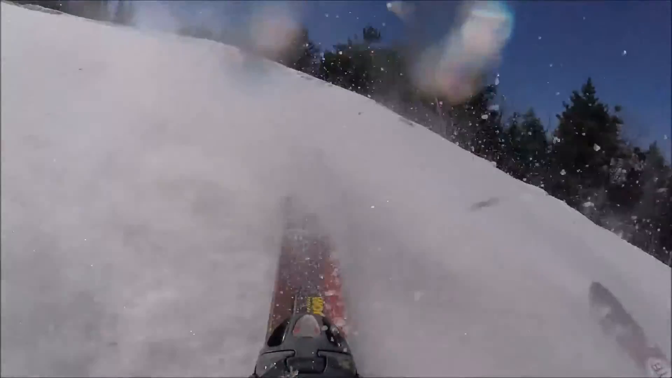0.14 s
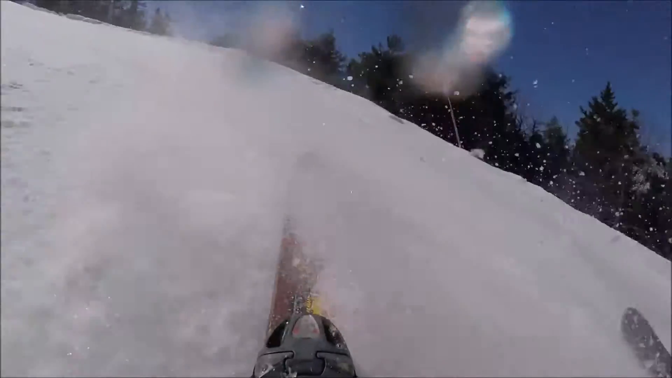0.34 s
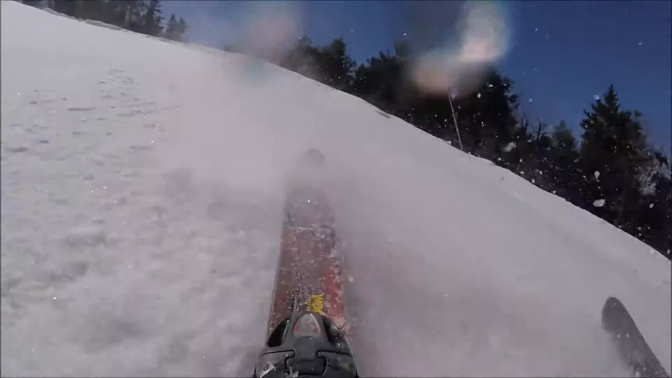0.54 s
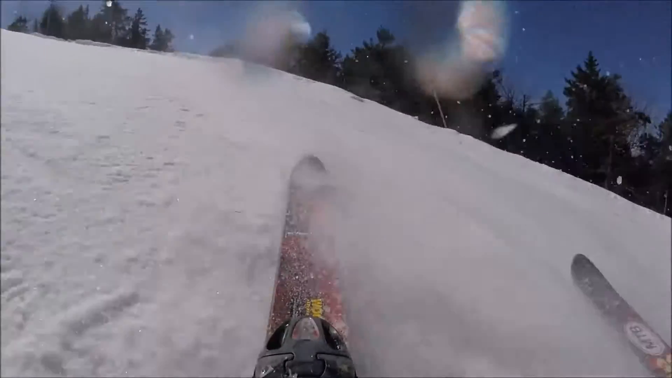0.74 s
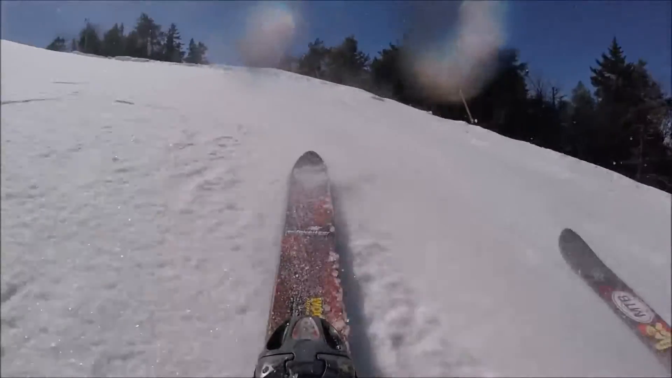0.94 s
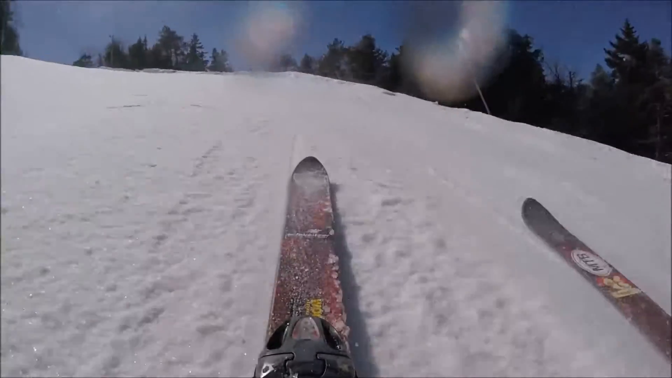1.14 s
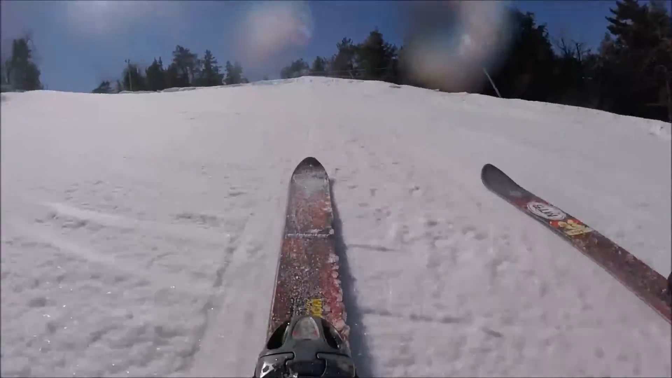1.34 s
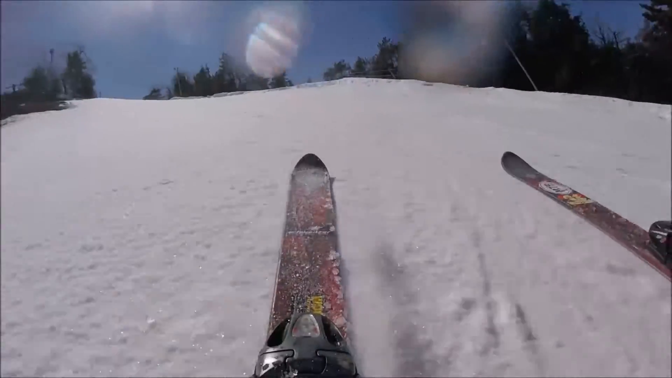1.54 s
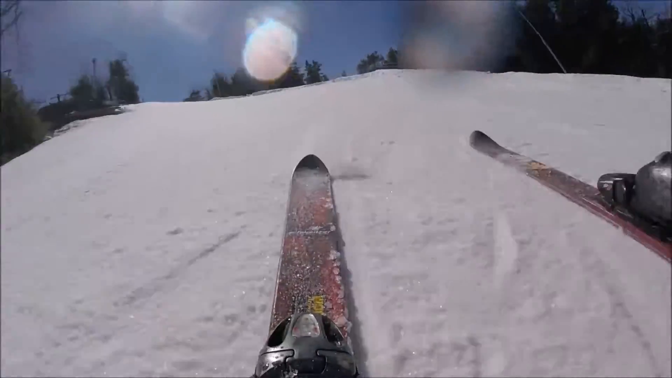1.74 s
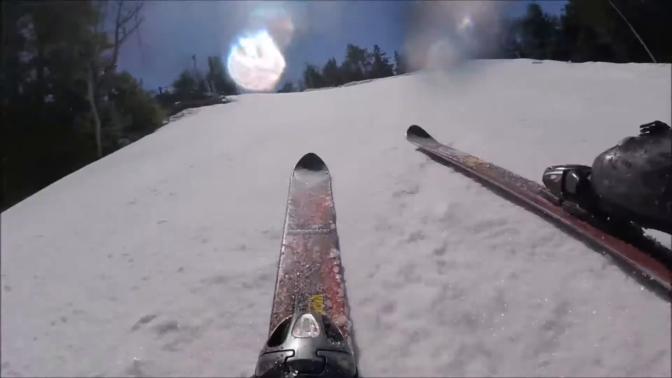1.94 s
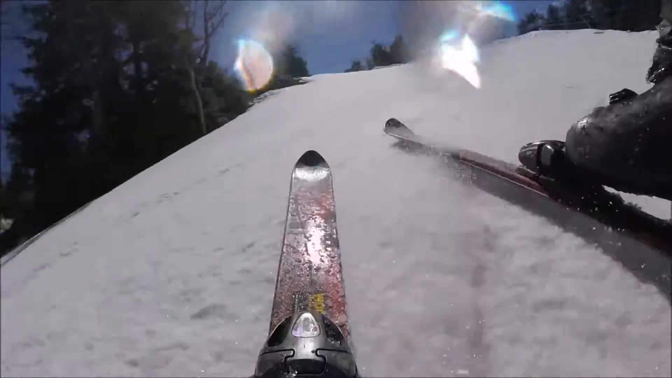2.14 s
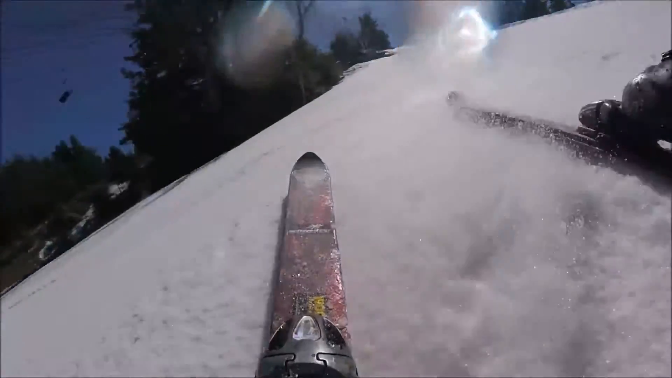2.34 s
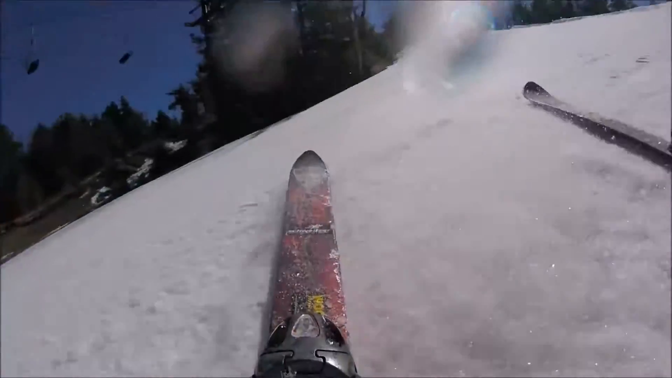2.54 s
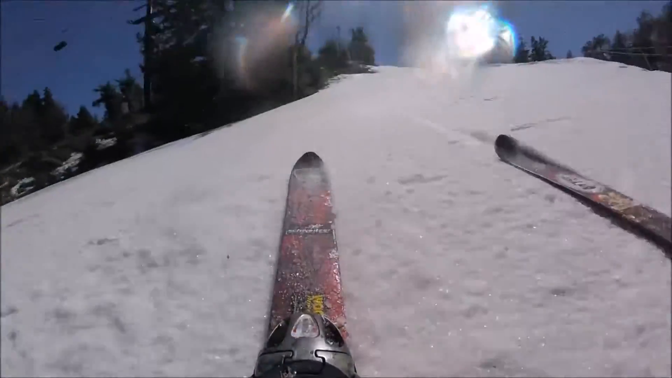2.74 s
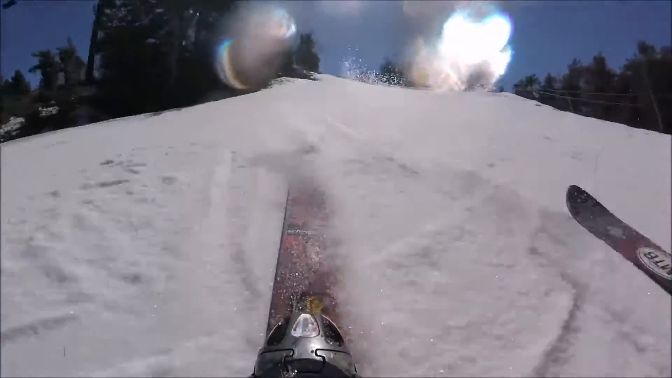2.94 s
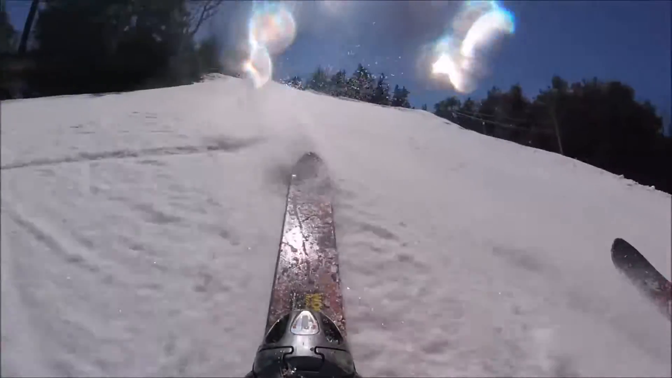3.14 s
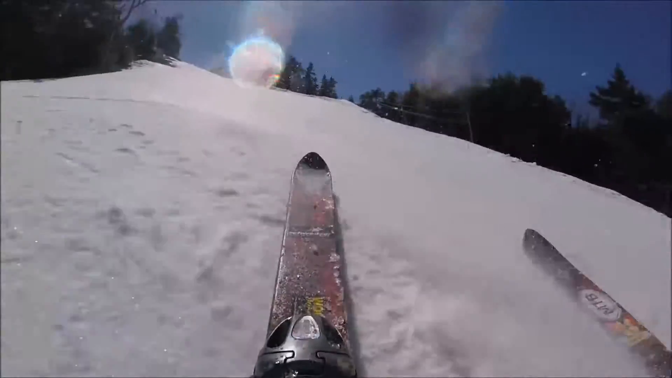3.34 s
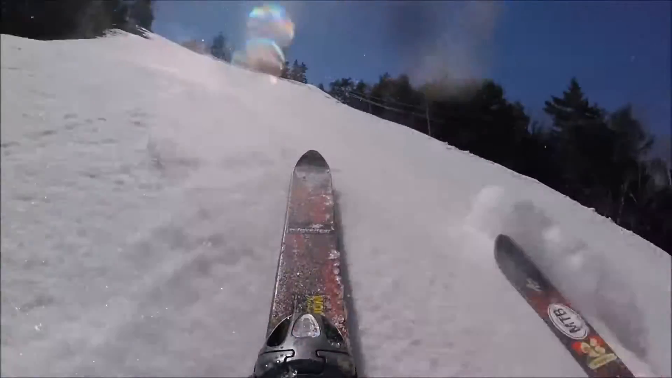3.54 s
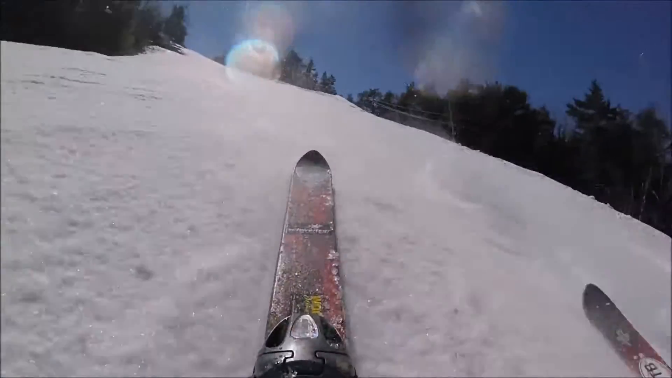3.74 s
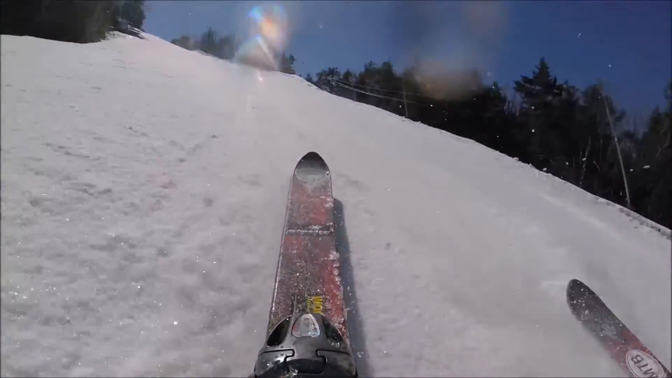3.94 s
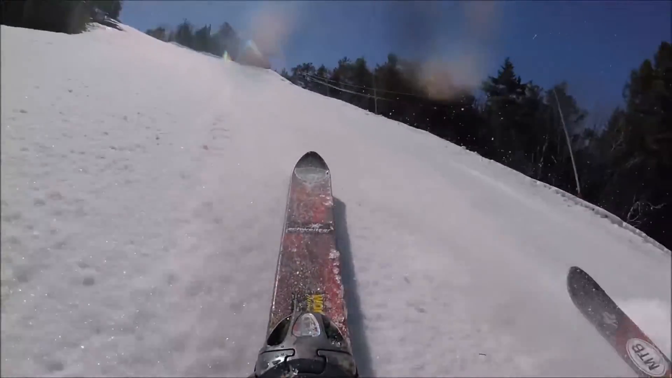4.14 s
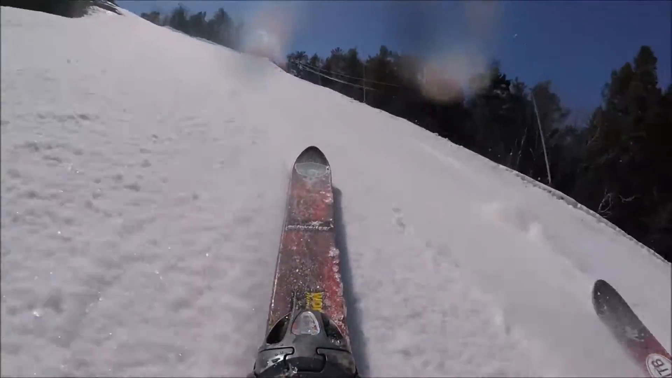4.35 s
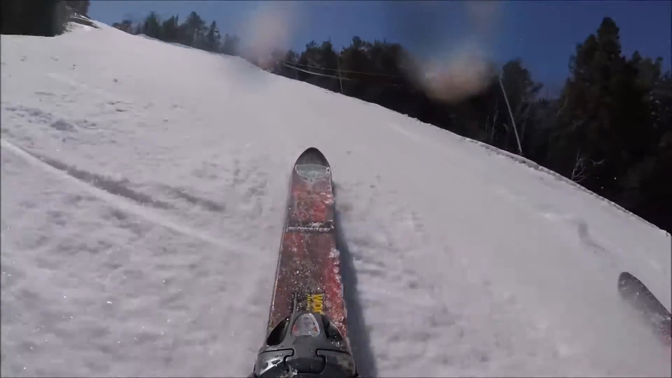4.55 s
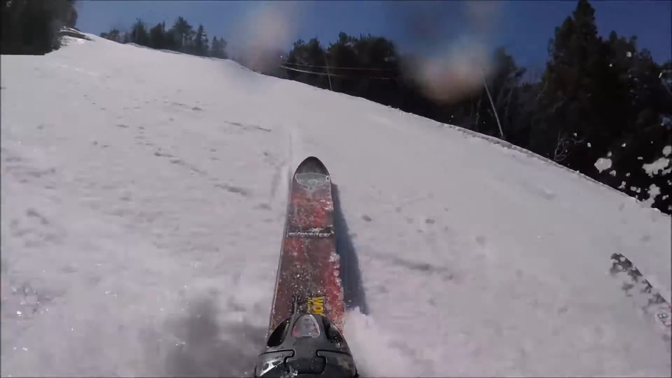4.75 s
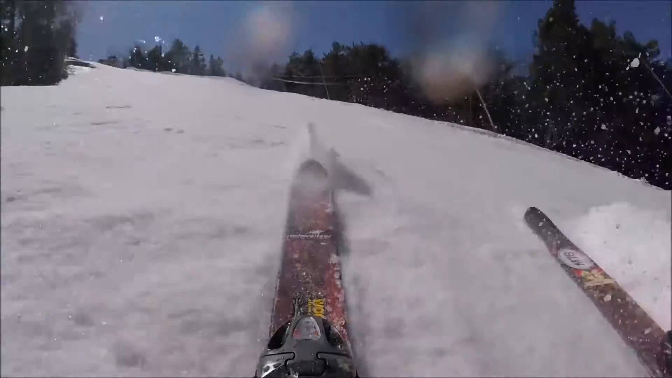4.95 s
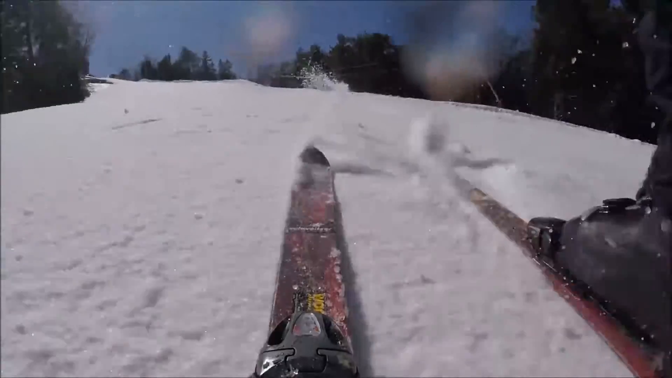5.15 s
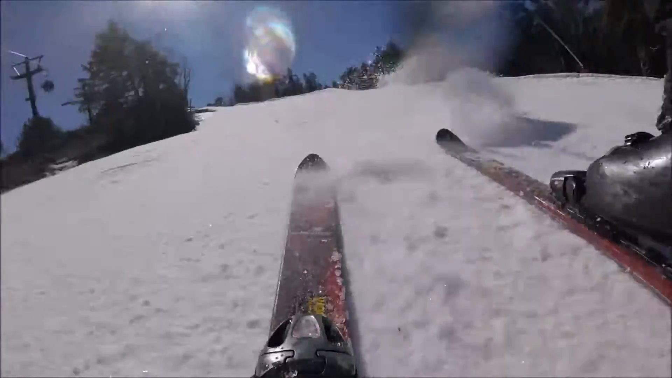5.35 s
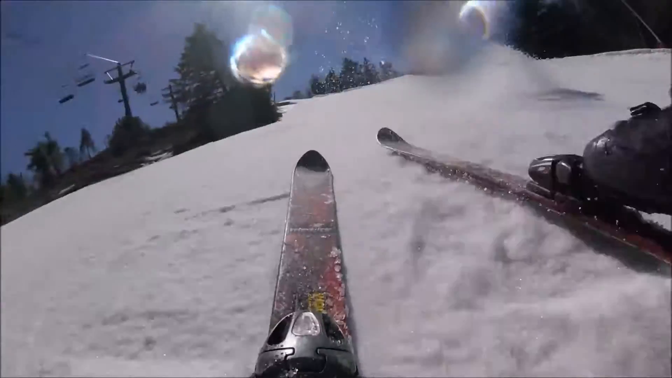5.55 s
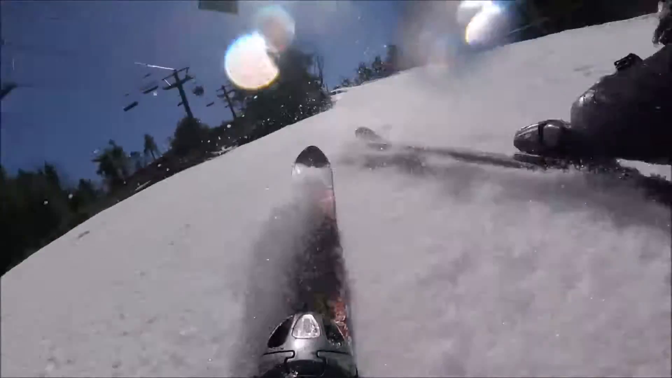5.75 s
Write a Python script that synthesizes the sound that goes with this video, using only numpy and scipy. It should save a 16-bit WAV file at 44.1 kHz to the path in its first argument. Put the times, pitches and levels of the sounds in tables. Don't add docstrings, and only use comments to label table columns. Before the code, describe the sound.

A close, dry mono outdoor sound from a camera clamped to a ski. It starts with grainy edge scraping, bright spray hiss and wind flapping on the housing, easing after 0.5 s to a thin glide from about 1 to 1.9 s. A strong carve swells at 2.2-2.6 s, with a low shudder, wind thump and hard double knock near 2.4 s. It drops briefly at 2.8 s, returns at 3.2-3.5 s with buffeting and heavy low jolts, dips at 3.75 s, then scrapes strongly around 4 s. Another deep jolt comes near 4.35 s; the edge bites at 4.8 s with dull knocks at 4.7 and 4.9 s. A near-floating lull at 5.1 s leads to a shorter carve around 5.35 s and a shudder at 5.5 s. Scraping fades while hiss rises again, with a sharp cluster of knocks at 5.8 s. A narrow, whistly hiss persists, its treble flickering and dropping out.

```python
import sys
import numpy as np
from scipy import signal
from scipy.fft import rfft, irfft, next_fast_len
from scipy.io import wavfile
from scipy.ndimage import uniform_filter1d

SR = 44100
rng = np.random.default_rng(int(sys.argv[2]) if len(sys.argv) > 2 else 0)


def generate_wav(sig):
    pcm = np.round(np.clip(np.atleast_2d(sig).T, -1, 1) * 32767).astype(np.int16)
    wavfile.write(sys.argv[1], SR, pcm)


def volts(x):
    e = np.asarray(x, float) / 20
    return 10 ** e


N = 259749
TIME = np.arange(N) / SR
MIDDLE_DB = -30


def columns(table):
    time_s, *values = np.transpose(table)
    return [np.interp(TIME, time_s, value) for value in values]


def unit(x):
    return x / np.sqrt(np.mean(x ** 2))


def walk(rate_hz):
    hold = int(SR / rate_hz)
    steps = np.repeat(rng.standard_normal(N // hold + 1), hold)
    slewed = uniform_filter1d(uniform_filter1d(steps, hold), hold)
    return unit(slewed[:N])


def grains(rate_hz, spread_db, share):
    breaks, strength, side = rng.random((3, N))
    size_db = spread_db * np.minimum(-np.log(1 - strength), 3.5)
    size = volts(size_db) * np.sign(side - .5)
    clicks = unit(size * (breaks < rate_hz / SR))
    return np.sqrt(share) * clicks + np.sqrt(1 - share) * rng.standard_normal(N)


def coloured(x, colour, flicker_db, rate_hz, count=4):
    size = next_fast_len(N)
    octave = np.log2(np.arange(size // 2 + 1) * SR / size + 1e-3)
    hz, db = np.transpose(colour)
    colour_db = np.interp(octave, np.log2(hz), db, left=-120, right=-120)
    spectrum = rfft(x, size) * volts(colour_db)
    centres = np.linspace(np.log2(hz[1]), np.log2(hz[-2]), count)
    total = np.zeros(N)
    for row in np.eye(count):
        part = irfft(spectrum * np.interp(octave, centres, row), size)[:N]
        total += part * volts(flicker_db * walk(rate_hz))
    return unit(total)


def dips(table):
    return sum(db * np.exp(-((TIME - s) / length_s) ** 2) for s, length_s, db in table)


def swells(peak_s, peak_db, sink_s, floor_db):
    coarse_s = TIME[::64]
    late_s = coarse_s - peak_s[:, None]
    away_s = np.where(late_s < 0, -late_s / .75, late_s)
    each = volts(peak_db[:, None] - 10 * away_s / sink_s[:, None])
    power = np.interp(TIME, coarse_s, np.sum(each ** 2, axis=0))
    return 10 * np.log10(power + volts(floor_db) ** 2)


# centre_s, length_s, loss_db
LIFTS = [
    (1.66, .06, -2.5),
    (1.785, .02, 6.5),
    (2.84, .035, 7.5),
    (3.81, .023, 3),
    (4.3, .04, -1.5),
    (5.04, .06, 5),
    (5.385, .025, 5),
    (5.48, .04, -2.5),
]


def lifts_db():
    return dips(LIFTS)


# time_s, gust_db
WIND = [(.08, -22), (1.2, -34), (1.5, -39), (1.7, -32), (2.0, -33), (2.15, -24), (2.55, -22), (2.8, -24),
        (3.0, -20), (3.14, -35), (3.5, -25), (3.9, -33), (4.33, -26), (4.62, -36), (5.05, -42), (5.15, -29),
        (5.5, -27), (5.89, -33)]


def gust_db():
    float_share = 1.6
    return columns(WIND)[0] - float_share * lifts_db()


# peak_s, peak_db, sink_10db_s
THUMPS = [(.27, -22, .15), (.57, -25, .08), (1.15, -36, .15), (2.0, -25, .06), (2.17, -16, .07),
          (2.3, -29, .1), (2.58, -32, .2), (2.93, -25, .15), (3.3, -28, .08), (3.46, -17, .07),
          (3.58, -30, .05), (3.85, -36, .1), (4.05, -29, .15), (4.43, -30, .1), (4.74, -37, .06),
          (5.24, -32, .1), (5.48, -22, .06), (5.58, -23, .06), (5.81, -34, .08)]
# pitch_hz, level_db
RUMBLE = [(12, -18), (22, -3.5), (35, -7), (48, 8), (62, -10), (100, -8.5), (140, -35)]
# pitch_hz, level_db
FLAP = [(60, -1), (100, 3), (160, -5.5), (250, -8), (400, -16), (800, -23)]


def wind():
    flap_db = gust_db()
    floor_db = -42 + .5 * (flap_db - MIDDLE_DB)
    rumble_db = swells(*np.transpose(THUMPS), floor_db)
    rumble = coloured(rng.standard_normal(N), RUMBLE, 1.1, 13, count=2)
    flap = coloured(grains(300, 2.96, 0.31), FLAP, 2.0, 20, count=3)
    gust = volts(1.7 * walk(18))
    return volts(rumble_db + 4.0) * rumble + volts(flap_db + 2.4) * gust * flap


# peak_s, peak_db, pitch_hz, sink_10db_s
JOLTS = [(.07, -15, 65, .05), (.18, -18, 65, .1), (.3, -17, 68, .03), (.57, -19, 71, .12),
         (.74, -20.5, 75, .15), (.97, -22, 70, .05), (1.27, -25, 78, .07), (1.42, -25, 78, .04),
         (1.66, -23, 87, .03), (1.76, -25, 82, .05), (1.95, -15.5, 79, .07), (2.1, -15.5, 86, .07),
         (2.22, -10, 79, .12), (2.49, -11, 71, .02), (2.65, -18, 74, .04), (2.85, -22, 90, .04),
         (2.95, -24, 88, .12), (3.33, -13.5, 76, .05), (3.53, -12, 75, .08), (3.64, -8.5, 76, .035),
         (3.79, -16.5, 73, .04), (3.93, -19, 72, .06), (4.19, -14, 74, .09), (4.35, -8.5, 75, .09),
         (4.54, -18, 76, .04), (4.73, -23, 73, .1), (4.95, -23, 81, .025), (5.16, -26, 79, .1),
         (5.47, -9, 75, .08), (5.82, -11, 72, .04)]


def clamp():
    peak_s, peak_db, pitch_hz, sink_s = np.transpose(JOLTS)
    tremor_db = -33 + .8 * (gust_db() - MIDDLE_DB)
    level_db = swells(peak_s, peak_db, sink_s, tremor_db) + 2.0 * walk(30) - 1.3
    hz = np.interp(TIME, peak_s, pitch_hz) * (1 + 0.0347 * walk(35))
    phase = 2 * np.pi * np.cumsum(hz) / SR
    swing = np.sin(phase) + volts(-21.5) * np.sin(2 * phase + 0.59)
    return np.sqrt(2) * swing * volts(level_db)


# start_s, peak_db, pitch_hz (negative pushes inward first)
KNOCKS = [(1.8395, -19, 1300), (1.8408, -16, 2600), (1.958, -17, 5397.5), (2.373, -7, 743),
          (2.38, -3.5, 1010), (2.883, -21, 633), (4.104, -18, 918), (4.72, -9, 648), (4.941, -13, 906),
          (5.7859, -10, 1900), (5.7872, -13, -520), (5.7883, -6, 950), (5.7886, -16, 2500),
          (5.7905, -15, 491), (5.7928, -14, 900)]


def knocks():
    out = np.zeros(N)
    t = np.arange(800) / SR
    for start_s, peak_db, hz in KNOCKS:
        i = int(start_s * SR)
        decay = np.exp(-t * abs(hz) / .9)
        attack = np.tanh(t / .00012)
        out[i:i + len(t)] += volts(peak_db + 2.5) * np.sin(2 * np.pi * hz * t) * decay * attack
    return out


# time_s, edge_load_db, spray_db, crust_db (hard snow is gritty, powder misty)
CARVE = [(0, -24.5, -24.5, 5.5), (.4, -29, -30.5, 4.5), (.68, -28.5, -30, 3.5), (.98, -33, -35.5, -.5),
         (1.85, -35.5, -31.5, 4), (2.33, -21.5, -20.5, -1.5), (2.55, -21, -23, 1.5), (2.78, -31.5, -33, 1),
         (3.2, -24.5, -25.5, -3), (3.45, -25, -24.5, 2.5), (3.74, -32.5, -31.5, 5), (4.0, -21, -23, 0),
         (4.25, -28.5, -29, 1.5), (4.78, -20.5, -25, -2), (5.11, -40, -30, 5), (5.33, -27, -24.5, 2.5),
         (5.62, -36, -32, 2), (5.89, -38, -26, 4)]
# centre_s, length_s, loss_db
THIN_MIST = [
    (1.35, .4, 2.5),
    (2.4, .25, 4.5),
    (2.92, .1, 2.5),
    (4.35, .2, 2),
    (5.5, .14, 3.5),
]
# pitch_hz, level_db
SCRAPE = [(150, -7.5), (300, -5.5), (500, 0), (700, -0.5), (820, 0.5), (960, -2), (1200, -4.5),
          (1800, -18.5), (3000, -43)]
# pitch_hz, level_db
GRIT = [(700, -32), (1300, -4.5), (2000, -3), (2500, -7.5), (3000, -8.5), (3800, -18), (4400, -26.5),
        (6000, -42)]
# pitch_hz, level_db
CAVITY = [(1800, -37), (2600, -24), (3200, -19), (3800, -21), (4300, -15), (5000, -4.5), (5500, 0.5),
          (5700, 1), (6000, -8.5), (6400, -21), (7200, -36)]
# pitch_hz, level_db
MIST = [(5500, -16.5), (6500, -1.5), (7500, -2), (9000, -9), (10500, -15), (11500, -21), (12900, -40.5),
        (13500, -70)]


def skis():
    scrape_db, hiss_db, crust_db = columns(CARVE)
    scrape_db = scrape_db - lifts_db()
    load_db, spray_db = scrape_db - MIDDLE_DB, hiss_db - MIDDLE_DB
    grit_db = -34 + .85 * load_db + .1 * spray_db + crust_db
    mist_db = -43.7 + .3 * load_db + .7 * spray_db - .25 * crust_db - dips(THIN_MIST)
    chatter_db = 0.88 * walk(30) + 1.4 * walk(70)

    crush = grains(1200, 4.2, .25)
    fine = grains(3000, 3.5, 0.2)
    scrape = coloured(crush, SCRAPE, 1.1, 28)
    grit = coloured(crush + .8 * fine, GRIT, 1.1, 32)
    hiss = coloured(fine, CAVITY, 1.1, 25.1, count=3)
    mist = coloured(fine, MIST, 0.96, 30)

    out = volts(scrape_db + chatter_db - 0.31) * scrape
    out += volts(grit_db + 0.72 * chatter_db - 0.6) * grit
    out += volts(hiss_db + 0.33 * chatter_db + 0.26) * hiss
    out += volts(mist_db + .5 * chatter_db + 2.36) * mist
    return out


def scene():
    return (wind() + clamp() + knocks() + skis())[None]


# pitch_hz, step_db
STEP = [(0, -30), (7000, -14), (8200, -1), (9200, 7), (11200, 8), (14000, 7)]
# time_s, coarseness_db
STARVED = [(.174, 8), (1.113, 7), (1.241, 9), (1.284, 9), (1.518, 10), (1.86, 10), (1.902, 10), (2.926, 10),
           (3.481, 7), (3.502, 8), (3.63, 8), (4.014, 7), (4.334, 11), (4.59, 8), (4.718, 8), (4.953, 10),
           (5.102, 9), (5.636, 10)]


def camera(x):
    hop, start, lines_a_band = 941, 120, 7
    frames = N // hop + 2
    padded = np.concatenate([np.zeros(hop - start), x, np.zeros(3 * hop)])
    n, k = np.arange(2 * hop), np.arange(hop)
    window = np.sin(np.pi * (n + .5) / (2 * hop))
    basis = window * np.cos(np.pi / hop * np.outer(k + .5, n + .5 + hop / 2))
    lines = padded[hop * np.arange(frames)[:, None] + n] @ basis.T
    hz = (k + .5) * SR / (2 * hop)

    power = uniform_filter1d(uniform_filter1d(lines ** 2, size=25), size=5, axis=0)
    local = np.sqrt(power + 1e-12)
    step = local * volts(np.interp(hz, *np.transpose(STEP)))
    cavity = local[:, np.searchsorted(hz, 5500), None]
    high = hz > 900
    for time_s, coarse_db in STARVED:
        m = round((time_s * SR - start) / hop)
        starved = volts(coarse_db - 1.5) * local[m] ** .7 * cavity[m] ** .3
        step[m, high] = starved[high]

    scatter = rng.standard_normal((frames, hop // lines_a_band + 1))
    scatter = np.repeat(scatter, lines_a_band, axis=1)[:, :hop]
    step = step * volts(4.5 * uniform_filter1d(scatter, size=3, axis=0))

    reach = walk(16)[np.minimum(hop * np.arange(frames), N - 1)]
    ceiling_hz = 11500 + 550 * abs(reach) ** 1.5
    lines = lines * (hz < ceiling_hz[:, None])
    rounded = np.sign(lines) * np.floor(abs(lines) / step + .4) * step
    blocks = rounded @ basis * 2 / hop
    overlapped = blocks[:-1, hop:] + blocks[1:, :hop]
    return np.concatenate([blocks[0, :hop], overlapped.ravel()])[hop - start:][:N]


def band_limit(x):
    return signal.sosfilt(signal.butter(12, 13020, fs=SR, output="sos"), x)


def record(dry):
    mix = camera(dry[0])[None]
    return band_limit(mix)


dry = scene()
out = record(dry)
generate_wav(out)
```